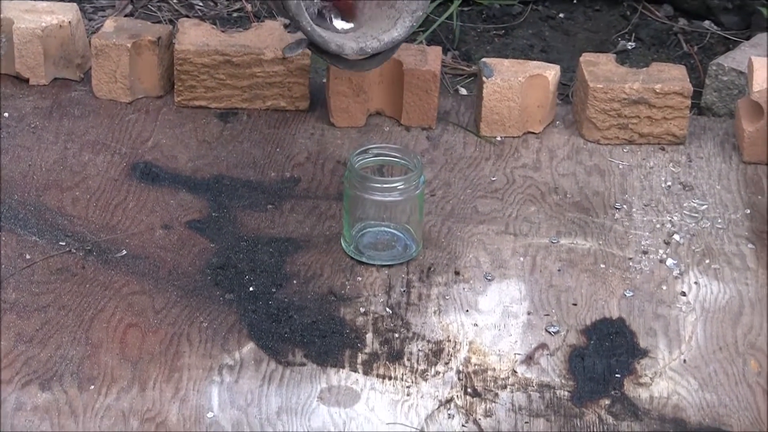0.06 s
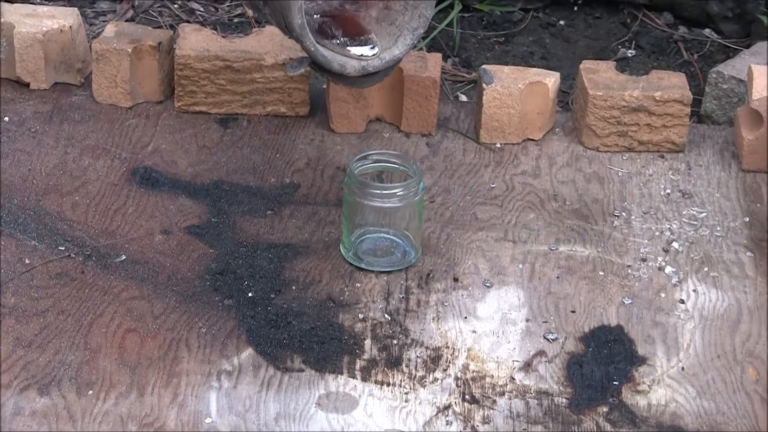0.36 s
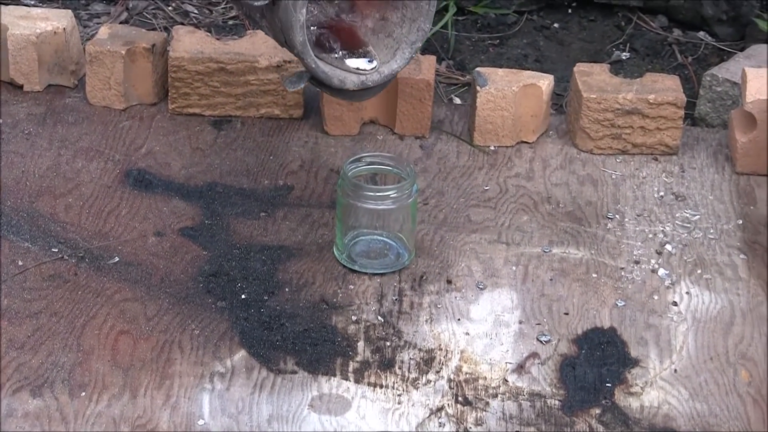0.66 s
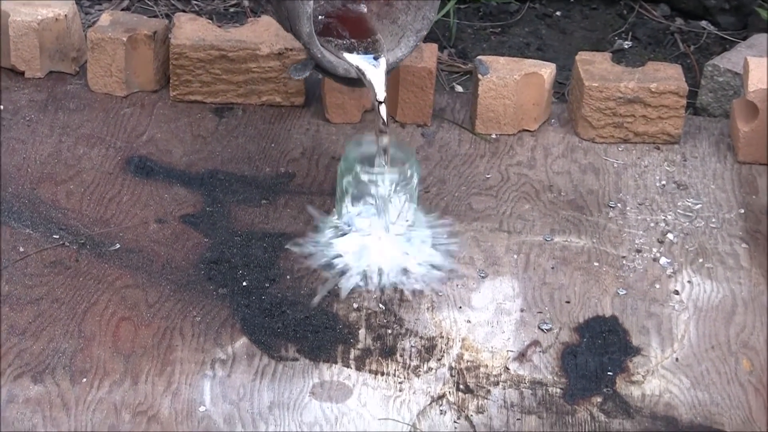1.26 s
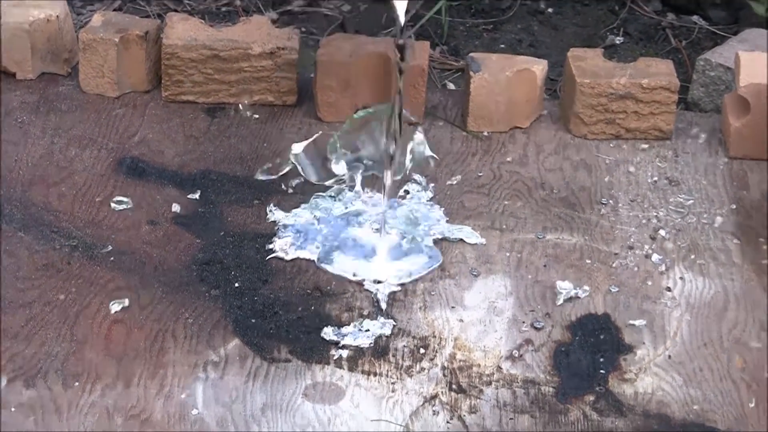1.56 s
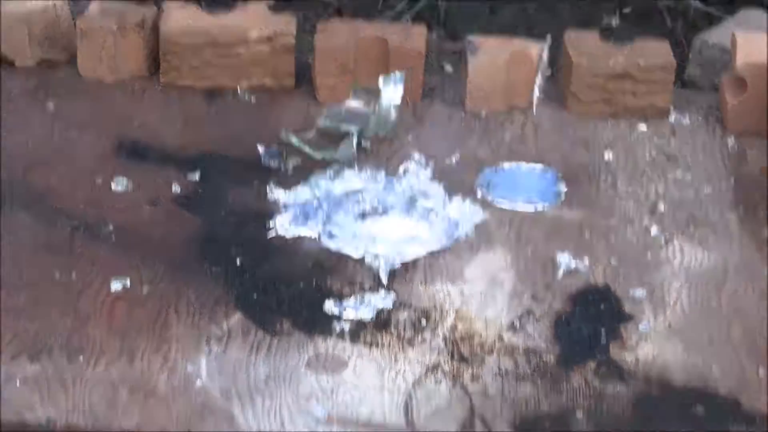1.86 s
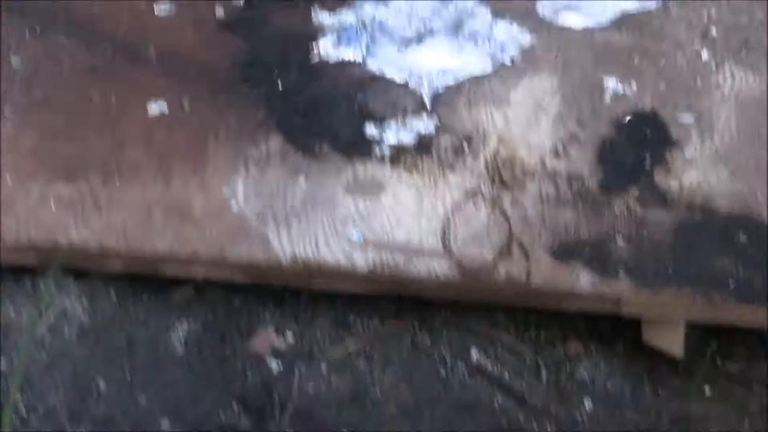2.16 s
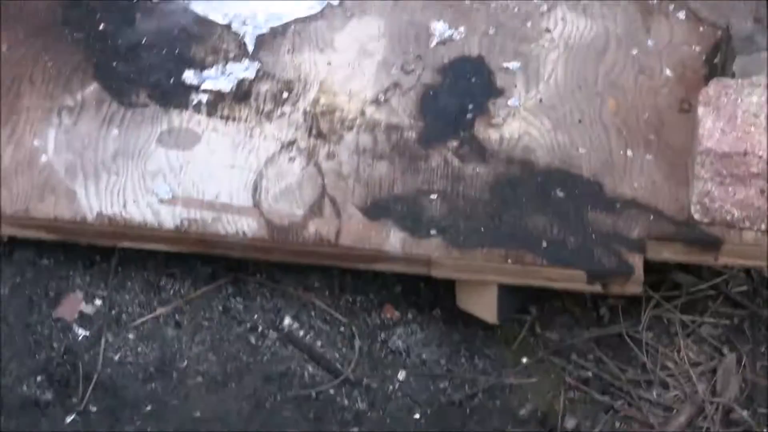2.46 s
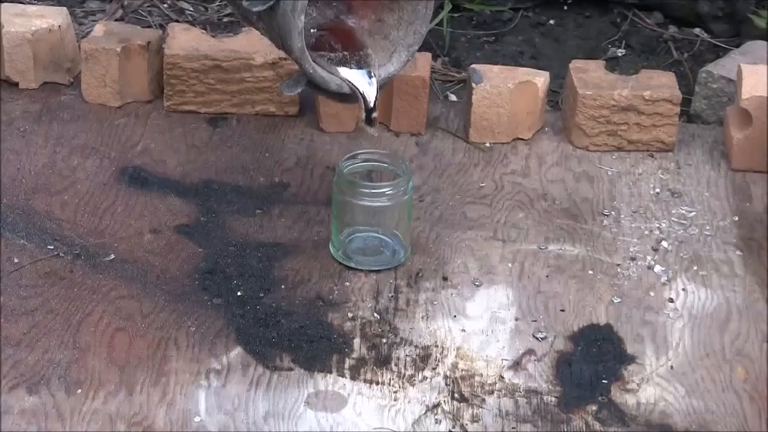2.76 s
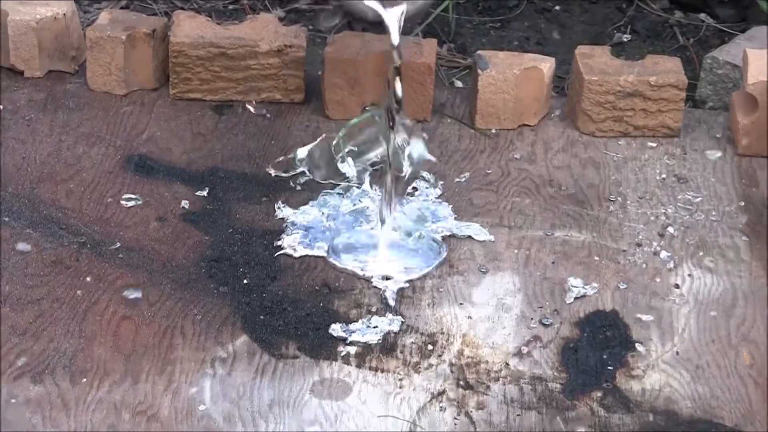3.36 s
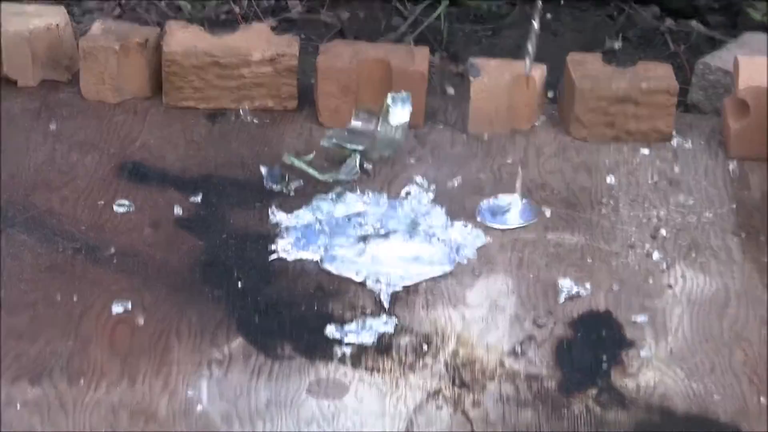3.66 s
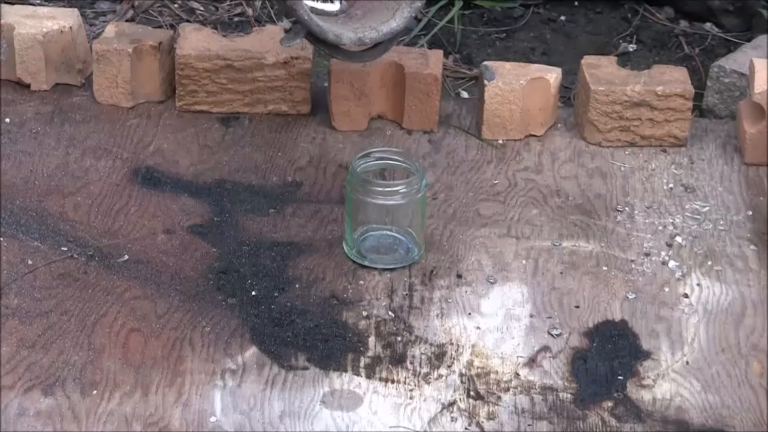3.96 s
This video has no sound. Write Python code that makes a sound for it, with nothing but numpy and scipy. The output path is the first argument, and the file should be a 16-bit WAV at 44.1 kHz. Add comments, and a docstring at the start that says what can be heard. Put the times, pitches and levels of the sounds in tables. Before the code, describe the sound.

A glass jar bursts with a loud crack, shards clinking and pattering down, heard twice.

```python
"""Molten metal bursts a glass jar

Outdoors, wind brushes the microphone over a low roar. A jar of molten metal on a plywood sheet bursts
with a crack that overloads the microphone. Heavy pieces thud on the board, shards click and ring, and
splinters patter down, echoing round the yard. The burst plays a second time, with two dull bumps."""
import sys
import numpy as np
from scipy import signal
from scipy.fft import rfft, irfft
from scipy.io import wavfile

SR = 44100
rng = np.random.default_rng(int(sys.argv[2]) if len(sys.argv) > 2 else 0)


def log_audio(samples):
    """Write samples as a 16-bit WAV file to the path given in sys.argv[1]."""
    # one column per channel
    frames = np.atleast_2d(samples).T
    # limit to full scale, then quantise
    limited = np.clip(frames, -1, 1)
    pcm = np.round(limited * 32767).astype(np.int16)
    wavfile.write(sys.argv[1], SR, pcm)


N = 176400
TIME = np.arange(N) / SR
HIT_TIME = np.arange(int(.3 * SR)) / SR  # time axis of a single hit [s]
LEFT_RIGHT = np.array([[1], [-1]])
BURST_S, GLASS_CORRELATION = 1.3048, 0.25


def amp(db):
    """Decibels to gain."""
    return 10 ** (np.asarray(db) / 20)


def unit(x):
    """Scales to an rms of one."""
    return x / np.sqrt(np.mean(x ** 2) + 1e-20)


def decay(t, t60):
    """Exponential fade, 60 dB down at t60."""
    return np.exp(-np.log(1000) * t / t60)


def curve_at(points, hz):
    """Reads a curve on a log-frequency axis."""
    freqs, values = np.transpose(points)
    return np.interp(np.log(hz + 1), np.log(freqs + 1), values)


def fader(points):
    """Gain ride through (time [s], level [dB]) points."""
    return amp(np.interp(TIME, *np.transpose(points)))


def equalise(x, eq):
    """Filters by a (frequency [Hz], level [dB]) curve."""
    hz = np.fft.rfftfreq(x.shape[-1], 1 / SR)
    return irfft(rfft(x) * amp(curve_at(eq, hz)), x.shape[-1])


def stereo(pair, correlation):
    """Blends two unrelated signals into left and right."""
    mid = np.sqrt((1 + correlation) / 2) * pair[0]
    side = np.sqrt((1 - correlation) / 2) * pair[1]
    return np.array([mid + side, mid - side])


def noise(eq, correlation, size=N):
    """Shaped stereo noise at an rms of one."""
    return unit(equalise(stereo(rng.standard_normal((2, size)), correlation), eq))


def add(mix, start_s, sound):
    """Drops a sound into the mix at its cue."""
    part = mix[:, round(start_s * SR):][:, :sound.shape[1]]
    part += sound[:, :part.shape[1]]


def swells(cues, edge_s=0.013):
    """Soft-edged blocks of gain from (start [s], end [s], level [dB]) cues."""
    return sum(amp(db) * np.clip(np.minimum(TIME - start, end - TIME) / edge_s + .5, 0, 1)
               for start, end, db in cues)


def ring(modes, spread=0):
    """Decaying modes, detuned by up to the fraction `spread`; high ones sit wider in stereo."""
    out = np.zeros((2, len(HIT_TIME)))
    for hz, db, t60 in modes:
        phase, detune, side = rng.uniform(-1, 1, 3)
        angle = np.pi * phase + LEFT_RIGHT * np.sign(side) * min(hz / 4000, np.pi / 4)
        tone = np.sin(2 * np.pi * hz * (1 + spread * detune) * HIT_TIME + angle)
        out += amp(db) * decay(HIT_TIME, t60) * tone
    return out


def struck(modes, centre_hz):
    """A blow favours the modes near its centre: the rest lose 5 dB per squared octave."""
    return [(hz, db - 5 * np.log2(hz / centre_hz) ** 2, t60) for hz, db, t60 in modes]


def chatter(depth=0.37, cutoff_hz=356, t60=0.19):
    """Gain flutter of glass that rattles on the board, then settles."""
    flutter = signal.lfilter(*signal.butter(2, cutoff_hz, fs=SR), rng.standard_normal(len(HIT_TIME)))
    return 1 + depth * unit(flutter) * decay(HIT_TIME, t60)


# EQ of the roar and of the hiss (frequency [Hz], level [dB])
ROAR_EQ = [(20, -13.5), (120, 4.5), (250, 1), (500, -5), (1000, -9), (2000, -21), (5000, -23),
           (9000, -31.5)]
HISS_EQ = [(30, 5), (300, -15), (1500, 0), (4000, -1), (6200, -0.5), (7600, -9.5), (15000, -15)]
# Fader ride of the roar (time [s], level [dB])
ROAR_RIDE = [(0, -57), (.6, -52.5), (1.3, -53), (1.9, -58), (2.2, -61), (2.45, -65), (2.62, -72),
             (2.71, -71.5)]


def outdoor_bed(hiss_db=-61):
    """A low roar swells and sinks under faint, steady hiss."""
    roar = noise(ROAR_EQ, correlation=0.69) * fader(ROAR_RIDE)
    return roar + amp(hiss_db) * noise(HISS_EQ, correlation=0.26)


# EQ of the wind rumble (frequency [Hz], level [dB])
WIND_EQ = [(20, -13), (55, -12.5), (95, 5.5), (190, -2.5), (280, -20.5), (2000, -56)]
# Gust cues (start [s], end [s], level [dB])
GUSTS = [(.47, .87, -45), (.66, .75, -42), (1.2, 1.31, -45.5)]


def wind(left_db=-19):
    """Gusts catch mostly the right side of the microphone."""
    return noise(WIND_EQ, correlation=.5) * swells(GUSTS) * amp([[left_db], [0]])


# EQ of the bright snap, the longer crack and the splinter shower (frequency [Hz], level [dB])
SNAP_EQ = [(150, -27.5), (3000, -4), (15000, 5)]
CRACK_EQ = [(30, -20.5), (150, -20), (260, -4.5), (600, -3.5), (1800, -2), (4500, -1), (8000, -6),
            (15000, -31)]
SHOWER_EQ = [(600, -19.5), (4300, -0.5), (8500, -0.5), (15000, -19)]
# Body of the jar and the board under it (frequency [Hz], level [dB], t60 [s])
JAR_MODES = [(279.5, -10, .04), (922, -13, 0.027), (1392, -5.5, 0.029), (2365, -2, .024), (2893, -18, .025),
             (3570, -14, 0.0096), (4150, -8, 0.022)]


def burst(fizz_lead_s=0.002):
    """A brief bright fizz leads into the snap, crack, shower and ring of the bursting jar."""
    def noise_hit(eq, db, t60, correlation):
        return amp(db) * noise(eq, correlation, len(HIT_TIME)) * decay(HIT_TIME, t60)

    fizz_eq = [(300, -20), (2000, -10), (5000, 5.5), (15000, -9)]
    fizz = noise_hit(fizz_eq, db=-21, t60=0.037, correlation=0.22)
    snap = noise_hit(SNAP_EQ, db=4.5, t60=0.0078, correlation=1)
    crack = noise_hit(CRACK_EQ, db=2, t60=0.023, correlation=0)
    shower = noise_hit(SHOWER_EQ, db=-21, t60=0.18, correlation=GLASS_CORRELATION) * chatter()
    out = np.zeros((2, N))
    add(out, BURST_S - fizz_lead_s, fizz)
    add(out, BURST_S, snap + crack + shower + amp(1) * ring(JAR_MODES))
    return out


# EQ of the spray (frequency [Hz], level [dB])
SPRAY_EQ = [(100, -19), (250, 6.5), (600, 0.5), (2400, -0.5), (4500, -5), (8500, -4), (10000, -7),
            (15000, -9.5)]
# Fader ride of the spray (time [s], level [dB])
SPRAY_RIDE = [(1.308, -24.5), (1.335, -38), (1.49, -32.5), (1.55, -45), (1.73, -40.5), (1.80, -53.5),
              (1.96, -49), (2.07, -55.5), (2.3, -60), (2.6, -80)]


def spray(sizes=56, hits_per_s=7000, spread_db=5):
    """Thousands of fine splinters and metal droplets land, each size with its own short ping."""
    out, t = np.zeros((2, N)), HIT_TIME[:len(HIT_TIME) // 20]
    for hz in np.linspace(np.sqrt(250), np.sqrt(15000), sizes) ** 2:
        landings = rng.integers(0, N, round(hits_per_s / sizes * N / SR))
        gains = amp(spread_db * np.minimum(rng.exponential(1, len(landings)), 4))
        hits = np.bincount(landings, gains, N)
        angle = LEFT_RIGHT * rng.choice([-1, 1]) * min(hz / 5000, np.pi / 4)
        fade = np.exp(-t * np.sqrt(hz * 3000) / 4)  # 4 cycles long at 3 kHz, more cycles higher up
        ping = np.sin(2 * np.pi * hz * t + angle) * fade
        out += hz ** .25 * unit(signal.oaconvolve(hits[None], ping, axes=1)[:, :N])
    return unit(equalise(out, SPRAY_EQ)) * fader(SPRAY_RIDE) * (TIME > BURST_S)


# Reverb time of the yard (frequency [Hz], t60 [s])
YARD_T60 = [(150, 1), (4000, 2.19), (14000, 1.84)]
# EQ of the reverb return (frequency [Hz], level [dB])
YARD_EQ = [(100, -12), (300, -12.5), (1500, -18), (5000, -22), (8500, -21), (14000, -23.5)]


def yard_echo(x, predelay_s=0.0023, length_s=.9):
    """Scattered echoes from walls and ground, each band dying at its own speed."""
    taps = stereo(rng.standard_normal((2, SR)) * (rng.random((2, SR)) < .1), correlation=0.71)
    hz, t, bands = signal.stft(taps, SR, nperseg=256)
    bands *= decay(t, curve_at(YARD_T60, hz)[:, None])
    tail = signal.istft(bands, SR, nperseg=256)[1][:, :SR]
    gate = np.clip(TIME[:SR] / predelay_s - 1, 0, 1) * (TIME[:SR] < length_s)
    tail = equalise(tail / np.linalg.norm(tail[0]), YARD_EQ) * gate
    return signal.fftconvolve(x, tail, axes=1)[:, :N]


# Shard palette, by name: (t60 at 2 kHz [s], modes as (frequency [Hz], level [dB]))
SHARDS = { "base": (0.25, [(2083, -5), (3714, -6), (4425, -5.5), (6960, -3), (7180, -8), (8403, -9),
          (11240, 1), (11680, -5), (13860, 1)]), "wall": (0.092, [(2175, 1.5), (3714, -12), (4330, -5),
          (11300, -8), (13850, -6)]), "rim": (.13, [(1345, -1), (2514, -4), (2988, -11), (6620, -5),
          (7725, -1), (14590, 3)]), "chip": (0.073, [(7500, -1), (12300, 3)]),
          "sliver": (0.099, [(4400, -8), (8170, -8.5), (11350, -6), (13930, 3)]),
          "crumb": (0.027, [(6960, -0.5), (7950, -2), (9000, -5.5), (12000, -4.5)])}


def shard_modes(shard, damping_power=0.91):
    """The notes of one shard; higher ones die sooner."""
    t60, modes = SHARDS[shard]
    return [(hz, db, t60 * (2000 / hz) ** damping_power) for hz, db in modes]


# Fader ride of the tinkle (time [s], level [dB])
TINKLE_RIDE = [(1.4, -35.5), (1.96, -36), (2.2, -45), (2.6, -63)]


def tinkle(sizes=16, hits_per_s=110):
    """Crumbs of glass of many sizes land at random and ping softly."""
    out = np.zeros((2, N))
    for _ in range(sizes):
        hits = (rng.random(N) < hits_per_s / sizes / SR) * rng.random(N)
        ping = ring(shard_modes("crumb"), spread=0.12)
        out += signal.oaconvolve(hits[None], ping, axes=1)[:, :N]
    return out * fader(TINKLE_RIDE) * (TIME > BURST_S)


# Click cues (time [s], level [dB], centre [Hz], half-width [octaves], t60 [s])
CLICKS = [(1.3652, -29, 1960, 0.91, 0.058), (1.391, -30.5, 2460, 1.4, 0.048), (1.42, -25, 4950, 1.9, 0.035),
          (1.456, -34, 3000, 2.3, 0.026), (1.472, -20, 1860, .7, 0.01), (1.4776, -14.5, 2380, 0.14, 0.018),
          (1.653, -19.5, 1980, 1.25, 0.024), (1.703, -27.5, 5000, 1.8, 0.036),
          (1.738, -21.5, 2800, 2.3, 0.039), (1.752, -34, 8550, 0.6, 0.083),
          (1.9248, -24, 6500, 1.5, 0.0073), (1.9736, -28.5, 2340, 0.26, 0.0069),
          (2.036, -30, 7600, 0.82, 0.0065), (2.097, -32, 1470, 0.72, 0.011),
          (2.211, -44.5, 3800, 0.8, 0.016), (2.4366, -38.5, 2800, 1.4, 0.0057),
          (2.5272, -40.5, 10500, .8, 0.0055)]


def clicks(pan_db=4):
    """Glass strikes wood, brick and other glass: short bands of noise, panned at random."""
    out, hz = np.zeros((2, N)), np.fft.rfftfreq(len(HIT_TIME), 1 / SR)
    for start_s, db, centre_hz, octaves, t60 in CLICKS:
        band = 1 / (1 + (np.log2((hz + 1) / centre_hz) / octaves) ** 4)
        fade = decay(HIT_TIME, t60)
        white = stereo(rng.standard_normal((2, len(HIT_TIME))), GLASS_CORRELATION)
        click = irfft(rfft(white) * band, len(HIT_TIME)) * fade
        gains = amp(db + pan_db * rng.uniform(-1, 1) * LEFT_RIGHT)
        add(out, start_s, gains * unit(click) * np.sqrt(np.mean(fade ** 2)))
    return out


# Clink cues (time [s], shard name, level [dB], centre [Hz])
CLINKS = [(1.4148, "crumb", -17.5, 8500), (1.5132, "crumb", -19, 8000), (1.5878, "chip", -22, 10000),
          (1.653, "rim", -26.5, 5500), (1.7037, "base", -27.5, 6600), (1.7362, "base", -33, 9500),
          (1.7395, "base", -27, 3000), (1.752, "base", -31, 9500), (1.763, "base", -34.5, 9500),
          (1.876, "wall", -29, 3030), (1.8868, "wall", -31.5, 8800), (1.926, "crumb", -25, 7000),
          (1.9976, "sliver", -27.5, 12100), (2.0185, "sliver", -26.5, 11000), (2.0295, "wall", -33.5, 4600),
          (2.117, "crumb", -33, 6000), (2.1343, "crumb", -32.5, 11100)]


def clinks():
    """Shards land, bounce and ring with their own notes, roughened by their rattle."""
    out = np.zeros((2, N))
    for start_s, shard, db, centre_hz in CLINKS:
        add(out, start_s, amp(db) * ring(struck(shard_modes(shard), centre_hz)) * chatter())
    return out


# Body of the plywood (frequency [Hz], level [dB], t60 [s])
BOARD_MODES = [(212.5, -5, .08), (284, -3, 0.062), (422, -9, 0.047), (515.6, -2, 0.048), (700, -2.5, 0.042),
               (952, -7, 0.05), (1360, -1, 0.033), (2320, 11.5, 0.017)]
# Thud cues (time [s], level [dB], centre [Hz])
THUDS = [(1.4211, -17, 372), (1.4706, -17, 570), (1.4755, -12.5, 234), (1.49, -26.5, 503),
         (1.5248, -19.5, 343), (1.6204, -13.5, 594), (1.624, -23, 303), (1.649, -24, 750),
         (1.7038, -21, 620), (1.8179, -27.5, 422), (1.8362, -32.5, 516), (1.872, -26.5, 474)]


def thuds(attack_s=0.0006, low_cut_hz=205):
    """Heavy pieces knock the plywood, which radiates little deep bass."""
    out = np.zeros((2, N))
    attack = np.minimum(HIT_TIME / attack_s, 1)
    for start_s, db, centre_hz in THUDS:
        add(out, start_s, amp(db) * attack * ring(struck(BOARD_MODES, centre_hz), spread=0.022))
    return signal.sosfilt(signal.butter(4, low_cut_hz, "high", fs=SR, output="sos"), out)


# Bump cues (start [s], end [s], level [dB])
BUMPS = [(3.60, 3.76, -48), (3.855, 3.90, -49.5)]
# EQ of the bumps (frequency [Hz], level [dB])
BUMP_EQ = [(35, 9), (70, 11.5), (130, -9), (1000, -74)]


def handling_bumps():
    """Dull mono bumps as the microphone is swung away."""
    return noise(BUMP_EQ, correlation=1) * swells(BUMPS)


def narrow_bass(x, mono_below_hz=1290):
    """The two sides of the microphone are close together, so lows reach both alike."""
    mid = x.mean(0)
    side = signal.lfilter(*signal.butter(1, mono_below_hz, "high", fs=SR), (x[0] - x[1]) / 2)
    return np.array([mid + side, mid - side])


def scene(repeat_from_s=2.712, repeat_delay_s=1.85283):
    """The burst and its clatter in the open air, then the same stretch again under the bumps."""
    hits = burst() + thuds() + clicks() + clinks() + tinkle()
    bumps = handling_bumps()
    once = wind() + outdoor_bed() + narrow_bass(hits + yard_echo(hits) + spray())
    again = np.roll(once, round(repeat_delay_s * SR), axis=1)
    return np.where(TIME < repeat_from_s, once, again) + bumps


def record(dry, high_cut_hz=15800):
    """The crack overloads at full scale; a steep low-pass then trims the top end."""
    low_pass = signal.firwin(255, high_cut_hz, window=("kaiser", 8), fs=SR)
    return signal.oaconvolve(np.clip(dry, -1, 1), low_pass[None], "same")


dry = scene()
out = record(dry)
log_audio(out)
```